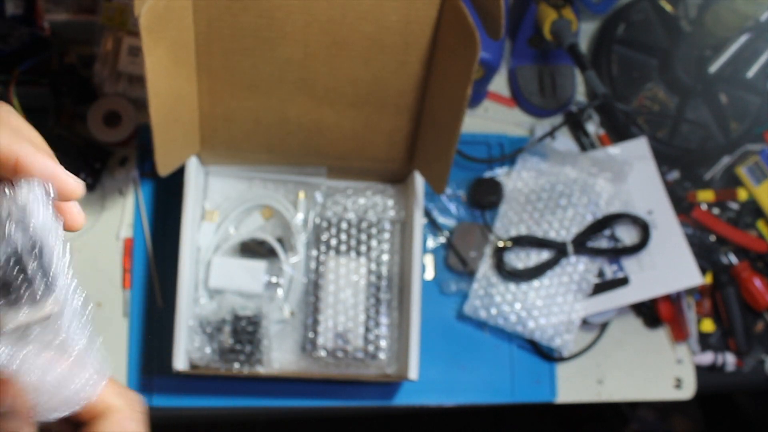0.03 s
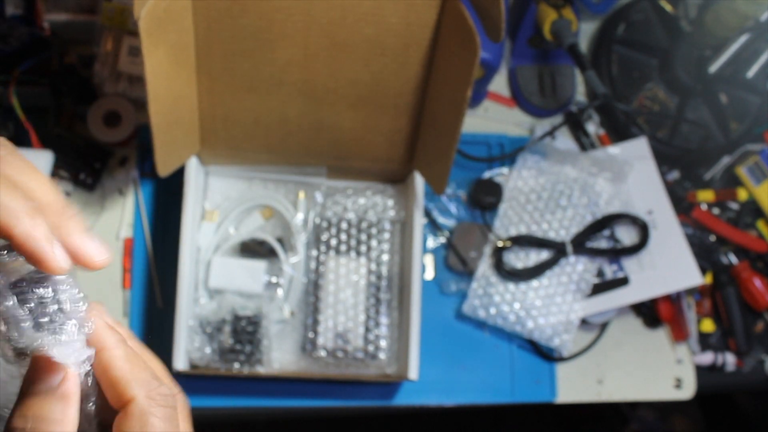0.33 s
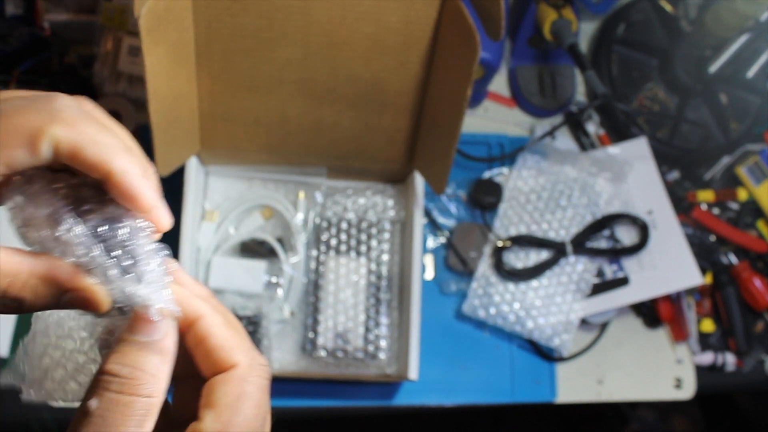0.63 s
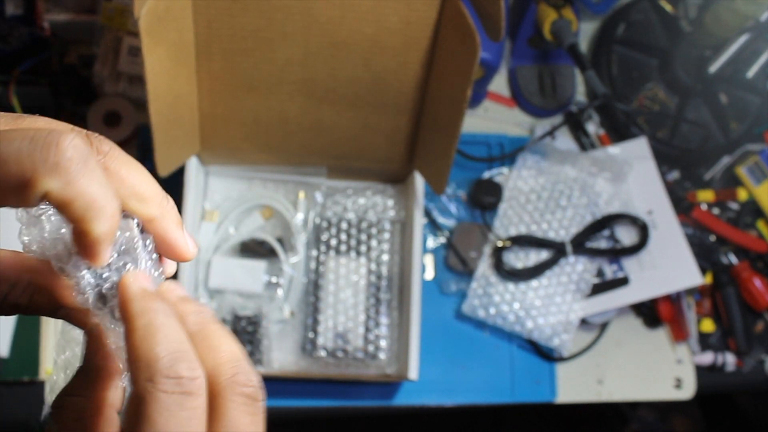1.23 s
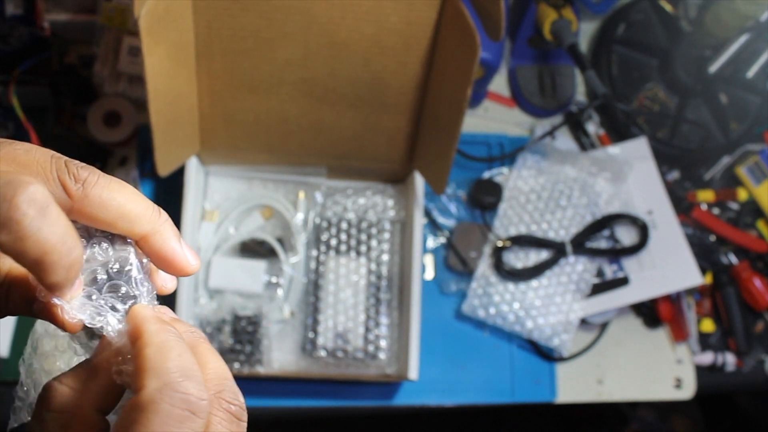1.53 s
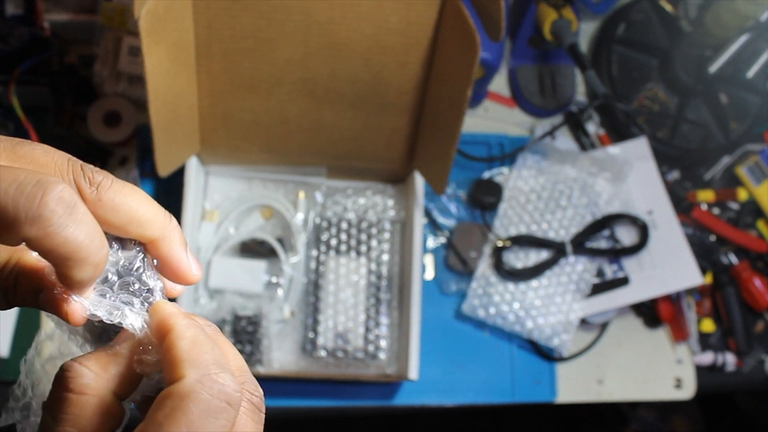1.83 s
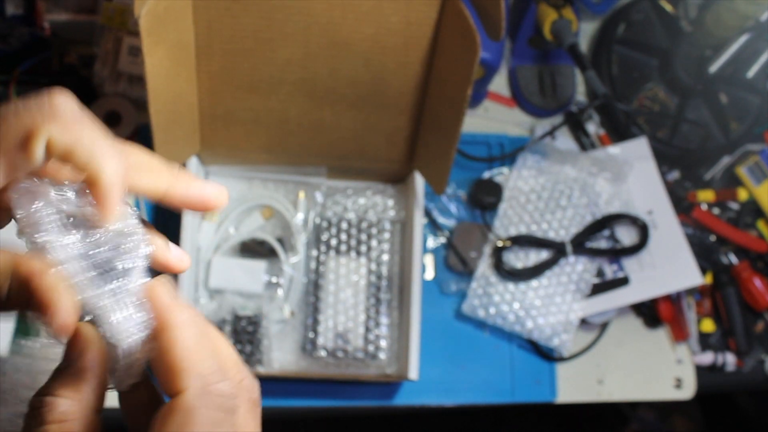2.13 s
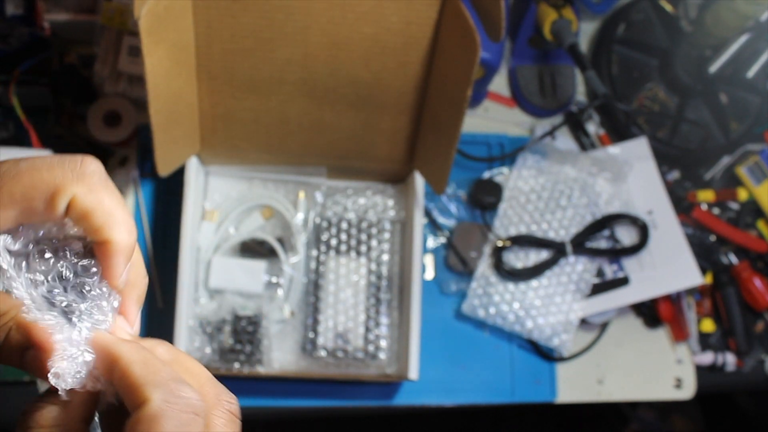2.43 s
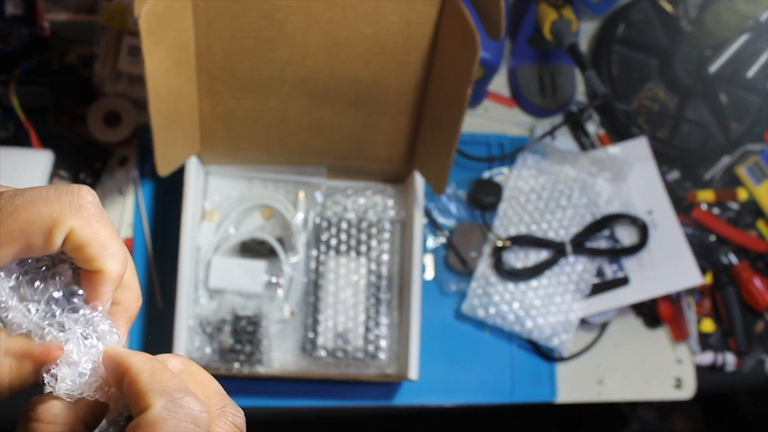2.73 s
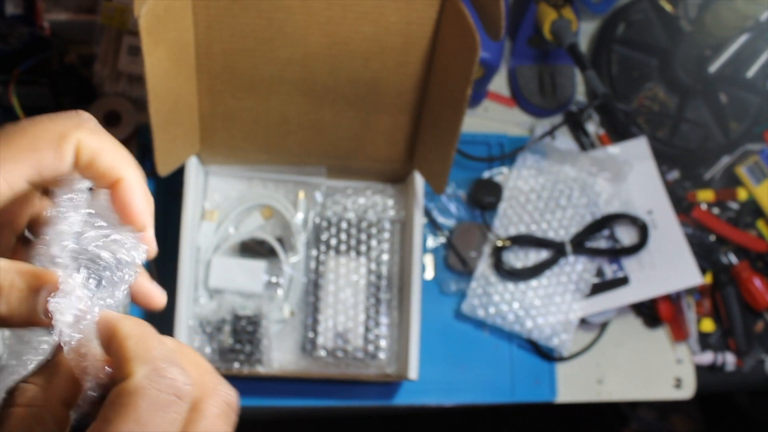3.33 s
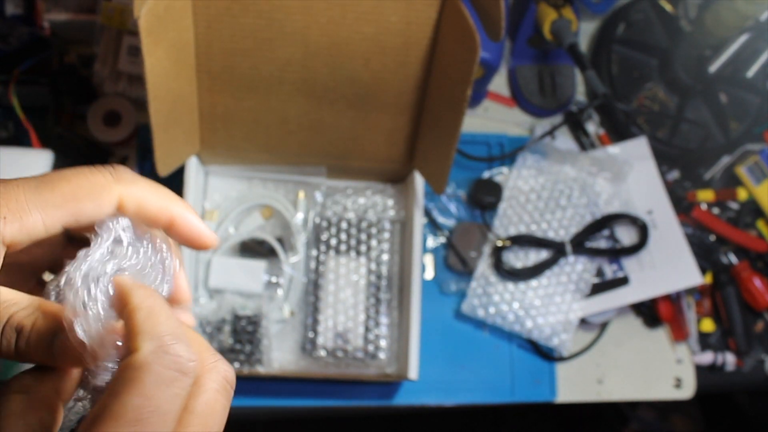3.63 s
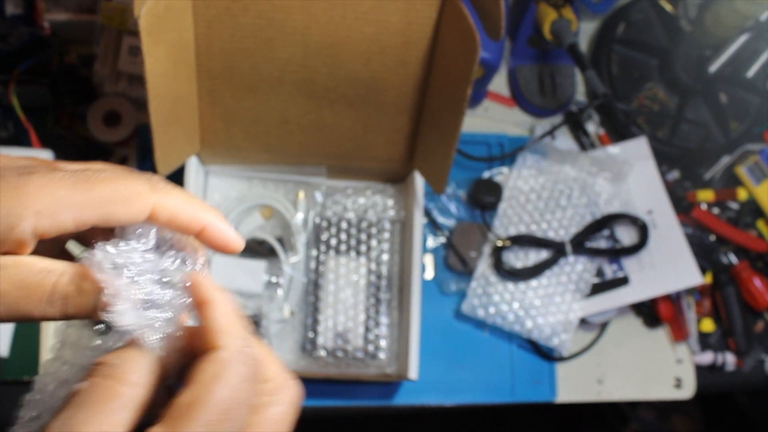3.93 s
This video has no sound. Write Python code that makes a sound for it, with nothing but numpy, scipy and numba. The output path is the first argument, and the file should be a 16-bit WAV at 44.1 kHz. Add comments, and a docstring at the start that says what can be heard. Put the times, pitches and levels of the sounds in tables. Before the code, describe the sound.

Bubble wrap crinkles softly and close from the start, swelling and easing as hands squeeze it, with small ticks and snaps. It quietens around 1.5 seconds, then picks up with a crisper snap just after 2 seconds. At about 3 seconds one bubble bursts with a loud, sharp pop that echoes briefly in the small room. Crinkling continues until 4 seconds, over a faint low hum.

```python
"""Soft, close crinkling: hands squeeze and unwrap bubble wrap over a workbench in a small quiet room.
Creases buckle in short runs of ticks over the fine rustle of sliding film; stiff folds snap and fingers
knock on the air cushions. About three seconds in, one bubble bursts, overloads the microphone, echoes
sharply off the bench and rings in the room. Room air and a faint hum lie underneath."""
import sys
import numpy as np
from scipy import signal
from scipy.fft import rfft, irfft, next_fast_len
from scipy.io import wavfile
from numba import njit

SR = 44100
rng = np.random.default_rng(int(sys.argv[2]) if len(sys.argv) > 2 else 0)


def bounce(signal):
    """Save signal as a 16-bit WAV file at the path given by the first command-line argument."""
    frames = np.transpose(np.atleast_2d(signal))
    limited = np.clip(frames, -1, 1)
    pcm = np.round(limited * 32767).astype(np.int16)
    wavfile.write(sys.argv[1], SR, pcm)


N = 176400

# how hard the hands work the wrap: time_s, level_db
HAND_EFFORT = [(0, -41.5), (.07, -39), (.19, -36), (.245, -36), (.275, -40), (.33, -29.5), (.42, -34),
               (.46, -33.5), (.51, -36), (.59, -37.5), (.64, -31.5), (.69, -42), (.74, -28), (.81, -35),
               (.92, -33.5), (.98, -33.5), (1.045, -47.5), (1.075, -37), (1.15, -43.5), (1.22, -27.5),
               (1.27, -40.5), (1.33, -32.5), (1.44, -38), (1.58, -41), (1.66, -43), (1.73, -41),
               (1.87, -44.5), (1.98, -44), (2.03, -34), (2.11, -33), (2.17, -29), (2.28, -38.5),
               (2.35, -26.5), (2.44, -37), (2.48, -32.5), (2.58, -34.5), (2.68, -40), (2.79, -38),
               (2.93, -41.5), (3.0, -39), (3.12, -58), (3.19, -40.5), (3.28, -31), (3.38, -31.5),
               (3.445, -42), (3.5, -37), (3.585, -32.5), (3.63, -37), (3.68, -33), (3.77, -35.5),
               (3.83, -34), (3.91, -38.5), (3.94, -33), (3.968, -26), (4.0, -34)]
# ride on the crinkle's top end: time_s, gain_db
TREBLE_RIDE = [(0, -6), (.27, -5), (.4, -1.5), (.7, -4.5), (.8, -8.5), (1.1, -3), (1.33, -3), (1.6, -4),
               (2.1, -4), (2.5, -4.5), (2.8, -2), (3.3, -5), (3.7, -2), (4, -6.5)]
# snaps of stiff folds and, from 3.03 to 3.10 s, four sharp early echoes of the pop off the bench and
# room: start_s, strength_db, pitch_hz
SNAPS_AND_ECHOES = [(.388, -9, 6070), (0.4495, -6, 6260), (.554, -6.5, 4100), (0.656, -16, 5900),
                    (0.716, -11.5, 1900), (0.8476, -7, 5160), (.9597, -7.5, 4370), (1.005, -21, 4600),
                    (1.0238, -8, 4530), (1.0705, -15, 6240), (1.194, -8, 6600), (1.245, -9.5, 6600),
                    (1.2952, -6.5, 6300), (1.3156, -10, 4300), (1.3482, -9, 5250), (1.3822, -10.5, 8500),
                    (1.499, -12.5, 6400), (1.5145, -15, 5800), (1.7088, -13, 5060), (1.9009, -15.5, 7950),
                    (1.9511, -5.5, 7400), (2.0484, -1, 6730), (2.07, -1.5, 6400), (2.0815, 7.5, 3450),
                    (2.1181, -1, 6100), (2.134, -1.5, 4900), (2.1396, -5, 6540), (2.2547, -7, 6300),
                    (2.2998, -28, 5700), (2.3798, -1, 4000), (2.4747, -5.5, 4160), (2.489, -10, 4600),
                    (2.5422, -5.5, 5340), (2.6403, -10.5, 5900), (2.7, -9.5, 2000), (2.7431, -9.5, 5500),
                    (2.8623, -12, 3740), (2.9831, -8, 5130), (3.0328, 12, 3260), (3.072, -8, 3400),
                    (3.0822, -2.5, 4960), (3.1009, -2, 5100), (3.138, -9, 6900), (3.233, 4.5, 6800),
                    (3.4778, -4.5, 6500), (3.4911, 1, 5100), (3.519, -9.5, 5930), (3.8937, -11, 3000),
                    (3.9677, 2.5, 3430)]
# the burst, then the skin slapping back: start_s, strength_db, tilt_db_per_octave
BURST_AND_SLAP = [(3.0232, 21.5, -0.5), (3.0524, 12, -4.5)]
# resonances of the torn cell: pitch_hz, gain_db, decay_cycles
CELL_MODES = [(1320, -2, 0.76), (2080, 2, 1.02), (2817, 1, 2.18), (5940, 6, 2.2), (11170, 3.5, 1.67)]
# fingers on the air cushions: start_s, strength_db, pitch_hz
FINGER_NUDGES = [(2.169, -12.5, 1300), (3.279, -13, 1500), (3.561, -10.5, 1260), (3.859, -21.5, 1030)]
# tone of the buckling creases: frequency_hz, gain_db
CREASE_EQ = [(100, -11), (300, -10.5), (420, -11), (520, -2), (720, -8.5), (1050, -17), (1380, 2),
             (1950, 4.5), (2350, -3.5), (3250, 4), (3850, -1.5), (5200, 5), (6300, 7.5), (7400, 2.5),
             (8600, 7), (10500, 1), (15500, 7.5)]
# tone of the sliding film: frequency_hz, gain_db
RUSTLE_EQ = [(100, -12.5), (500, -8), (720, -11.5), (1050, -3), (1500, -5.5), (2400, 0.5), (3250, -0.5),
             (4000, 0), (6200, 2), (8500, -3), (11000, -10), (15500, -19)]
# tone of the pop's reflections: frequency_hz, gain_db
POP_ROOM_EQ = [(100, -24), (350, -19), (600, -1), (740, -14), (860, -2.5), (1030, -5), (1340, 3.5),
               (1520, -6.5), (1920, 4), (2300, -4), (2850, 2), (3800, -8), (5200, 0), (6200, -3),
               (7500, -9), (10000, -13.5), (15500, -22)]
# tone of the reflections around the hands: frequency_hz, gain_db
ROOM_EQ = [(60, -28), (300, 2.5), (550, 6.5), (750, 6.5), (1000, -3.5), (1300, -0.5), (2000, -3),
           (2900, -0.5), (3900, -5.5), (5200, 1), (6300, -7.5), (7500, -4), (10000, -0.5), (15500, -14)]
# tone of the room air: frequency_hz, gain_db
AIR_EQ = [(25, 3), (70, -19), (105, -9), (150, -5), (280, 8.5), (420, -2), (600, 3), (1000, -0.5),
          (3000, -4.5), (8000, -92), (15500, -36)]
# partials of the machine hum: pitch_hz, level_db
HUM_PARTIALS = [(43.1, -68), (59.2, -63.5), (102.3, -70.5), (360.7, -68)]

CREASES_PER_S, AT_EFFORT_DB, TENFOLD_RATE_DB = 420, -35, 44  # 44 dB more effort, ten times the creases
TICK_HZ, TICK_SPREAD_OCTAVES, TICK_GAP_S, TICK_FALL_DB = 4520, 0.63, .001, 1
EDGE_HZ, EDGE_DB, EDGE_SCATTER_DB = 9100.0, -11, 1.5  # a tick's bright attack
RING_DECAY_CYCLES, CREASE_SCATTER_DB = 0.92, 3
RUSTLE_DB, RUSTLE_SCATTER_DB = -5, -0.5
SNAP_TRIM_DB, CRACK_DB, CRACK_PITCH_RATIO = -2, -7.5, 1.26
SETTLE_S, SETTLE_DB, BOUNCE_S, BOUNCE_DB = .002, -8.5, .00075, -15.5
PUFF_DELAY_S, PUFF_DB, PUFF_HZ = 0.00077, 9.5, 590.0
CRINKLE_SEND_DB, SNAP_SEND_DB, NUDGE_SEND_DB, POP_SEND_DB = -6.5, -6.5, 0.5, 21.5  # reverb sends
SLAP_VS_BURST_DB = -6.5  # balance going into the reverb
AIR_DB, OVERLOAD_CEILING, TOP_HZ = -52, .72, 15800


def crinkle():
    """Creases and rustle swell with the effort of the hands and spill into the room."""
    effort = curve(HAND_EFFORT)
    film = effort * (creases(effort) + amp(RUSTLE_DB) * rustle())
    treble = signal.sosfiltfilt(signal.butter(2, 7000, "high", fs=SR, output="sos"), film)
    film = film + (curve(TREBLE_RIDE) - 1) * treble
    return film + amp(CRINKLE_SEND_DB) * moving_room(film)


def creases(effort, candidates=4000, ticks_per_run=4):
    """Each crease buckles in a short run of fading ticks; more give way under a harder squeeze."""
    position, chance = rng.random((candidates, 2)).T
    weight, stiffness = rng.standard_normal((candidates, 2)).T
    squeeze = effort[(position * N).astype(int)] / amp(AT_EFFORT_DB)
    rate = CREASES_PER_S * squeeze ** (20 / TENFOLD_RATE_DB)
    buckles = chance < rate * N / SR / candidates
    start_s, ticks = position * N / SR, 0
    for k in range(ticks_per_run):
        gap, kick, detune, bright = rng.standard_normal((candidates, 4)).T
        size = amp(CREASE_SCATTER_DB * np.minimum(weight, 1.5) - TICK_FALL_DB * k) * np.tanh(kick)
        octaves = TICK_SPREAD_OCTAVES * (stiffness + detune) / np.sqrt(2)
        hz = np.clip(TICK_HZ * 2 ** octaves, 500, 15000)
        edge = size * amp(EDGE_DB + EDGE_SCATTER_DB * bright)
        ticks += rings(start_s[buckles], size[buckles], hz[buckles], RING_DECAY_CYCLES)
        ticks += rings(start_s[buckles], edge[buckles], np.full(buckles.sum(), EDGE_HZ), cycles=0.81)
        start_s = start_s + TICK_GAP_S * gap ** 2
    return level_out(equalise(ticks, CREASE_EQ))


def rustle(slips=20000):
    """Film slides over film in thousands of tiny slips."""
    where = rng.integers(0, N, slips)
    weight, direction = rng.standard_normal((slips, 2)).T
    clicks = np.bincount(where, amp(RUSTLE_SCATTER_DB * weight) * np.sign(direction), N)
    return level_out(equalise(clicks, RUSTLE_EQ))


def snaps_and_echoes(after_ticks=2):
    """Fold snaps and the pop's early echoes share one shape: crack, brief ring, smaller ticks, bounce."""
    start_s, db, hz = np.array(SNAPS_AND_ECHOES).T.copy()
    size = amp(db + SNAP_TRIM_DB)
    hits = rings(start_s, size, hz, RING_DECAY_CYCLES)
    hits += rings(start_s, size * amp(CRACK_DB), hz * CRACK_PITCH_RATIO, cycles=0.5)
    for gap in rng.random((len(start_s), after_ticks)).T:
        start_s = start_s + SETTLE_S * (.5 + gap)
        size = -size * amp(SETTLE_DB)
        hits += rings(start_s, size, hz, RING_DECAY_CYCLES)
    hits = highpass(hits, hz=1610)
    hits += amp(BOUNCE_DB) * np.roll(hits, int(BOUNCE_S * SR))  # off the hand
    return hits + amp(SNAP_SEND_DB) * moving_room(hits)


def bubble_pop():
    """The torn cell cracks brightly, puffs out its air and slaps back; the room rings with it."""
    start_s, db, tilt = np.array(BURST_AND_SLAP).T.copy()
    crack = 0
    for k, (hz, mode_db, cycles) in enumerate(CELL_MODES):
        size = amp(db + mode_db + tilt * np.log2(hz / CELL_MODES[0][0]))
        crack += (-1) ** k * rings(start_s, size, np.full(len(start_s), float(hz)), cycles)
    puff = rings(start_s[:1] + PUFF_DELAY_S, amp([PUFF_DB]), np.array([PUFF_HZ]), cycles=0.16)
    burst, slap = (signal.unit_impulse(N, int(at * SR)) for at in start_s)
    tail = room(burst + amp(SLAP_VS_BURST_DB) * slap, POP_ROOM_EQ, t60_s=0.25, hold_s=0.03)
    return highpass(crack, hz=500) + puff + amp(POP_SEND_DB) * tail


def finger_nudges():
    """Soft, hollow knocks of fingers on the air cushions."""
    start_s, db, hz = np.array(FINGER_NUDGES).T.copy()
    knocks = highpass(rings(start_s, amp(db), hz, cycles=1.75), hz=447)
    return knocks + amp(NUDGE_SEND_DB) * moving_room(knocks)


def room(x, eq, t60_s, hold_s=0, predelay_s=0.0015):
    """Dense reflections from bench, shelves and walls: they hold for hold_s, then die away."""
    t = np.arange(SR // 4) / SR
    decay = np.exp(-np.log(1000) * np.maximum(t - hold_s, 0) / t60_s)
    tail = rng.standard_normal(len(t)) * (t > predelay_s) * decay
    tail = equalise(tail / np.sqrt(np.sum(tail ** 2)), eq)
    return signal.fftconvolve(x, tail)[:N]


def moving_room(x, crossfade_s=0.249):
    """The wrap moves, so each pattern of reflections crossfades into a fresh one."""
    reflections, step = np.zeros(N + SR), int(crossfade_s * SR)
    for start in range(-step, N, step):
        a, b = max(start, 0), min(start + 2 * step, N)
        fade = np.sin(np.pi * (np.arange(a, b) - start) / (2 * step))
        wet = room(x[a:b] * fade, ROOM_EQ, t60_s=0.12)
        reflections[a:a + len(wet)] += wet
    return reflections[:N]


def room_tone():
    """A bed of quiet air and low, beating machine hum."""
    t = np.arange(N) / SR
    hum = sum(amp(db) * np.sqrt(2) * np.sin(2 * np.pi * (hz * t + rng.random()))
              for hz, db in HUM_PARTIALS)
    air = equalise(rng.standard_normal(N), AIR_EQ)
    return hum + amp(AIR_DB) * air / np.sqrt(np.mean(air ** 2))


@njit
def rings(start_s, sizes, hz, cycles):
    """Damped sines of energy about size squared, falling to 1 / e in the given number of cycles."""
    track = np.zeros(N)
    for k in range(len(start_s)):
        life = cycles * SR / hz[k]
        pole = -1 / life + 2j * np.pi * hz[k] / SR
        first = int(start_s[k] * SR) + 1
        phasor = 2 * sizes[k] / np.sqrt(life) * np.exp(pole * (first - start_s[k] * SR))
        turn = np.exp(pole)
        for i in range(max(first, 0), min(first + int(8 * life) + 2, N)):
            track[i] += phasor.imag
            phasor *= turn
    return track


def level_out(x, smooth_s=0.057):
    """Holds the slow level of a crackle near 1, so that the hands set its loudness."""
    width = int(smooth_s * SR)
    power = signal.fftconvolve(x ** 2, np.hanning(2 * width) / width, "same")
    return x / np.sqrt(np.maximum(power, 1e-3 * np.mean(x ** 2)))


def equalise(x, eq):
    """Minimum-phase EQ through (frequency_hz, gain_db) points: nothing rings ahead of an attack."""
    size = next_fast_len(len(x) + 4096) // 2 * 2
    hz, db = np.array(eq).T
    bins_hz = np.maximum(np.arange(size // 2 + 1) * SR / size, 1)
    gain = amp(np.interp(np.log(bins_hz), np.log(hz), db))
    cepstrum = irfft(np.log(gain), size)
    cepstrum[1:size // 2] *= 2
    cepstrum[size // 2 + 1:] = 0
    return irfft(rfft(x, size) * np.exp(rfft(cepstrum)), size)[:len(x)]


def highpass(x, hz):
    return signal.sosfilt(signal.butter(2, hz, "high", fs=SR, output="sos"), x)


def curve(points):
    """A fader ride through (time_s, gain_db) points."""
    return amp(np.interp(np.arange(N) / SR, *np.array(points).T))


def amp(db):
    return 10 ** (np.asarray(db) / 20)


def scene():
    """The mono mix: the wrap up front, room tone behind."""
    return (crinkle() + snaps_and_echoes() + bubble_pop() + finger_nudges() + room_tone())[None]


def record(dry):
    """The microphone soft-clips on the pop; a steep low-pass trims the very top."""
    clipped = dry / (1 + (dry / OVERLOAD_CEILING) ** 6) ** (1 / 6)
    return signal.sosfilt(signal.ellip(10, .2, 80, TOP_HZ, fs=SR, output="sos"), clipped)


dry = scene()
out = record(dry)
bounce(out)
```